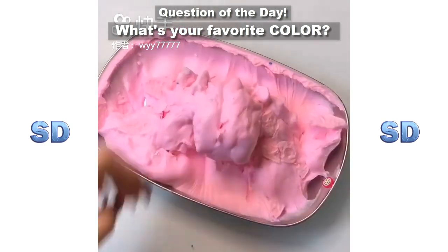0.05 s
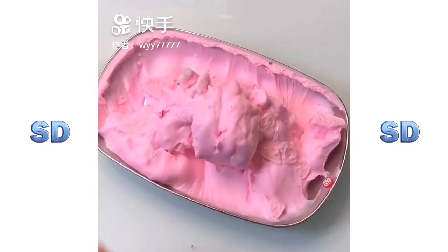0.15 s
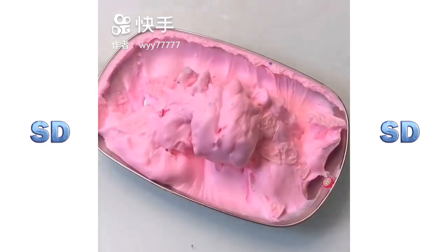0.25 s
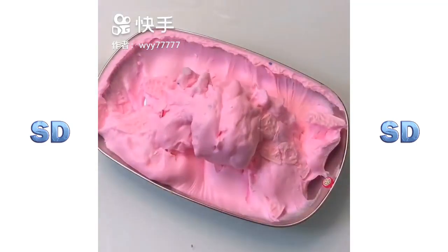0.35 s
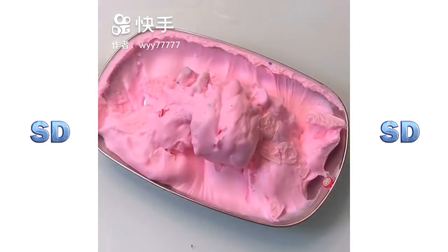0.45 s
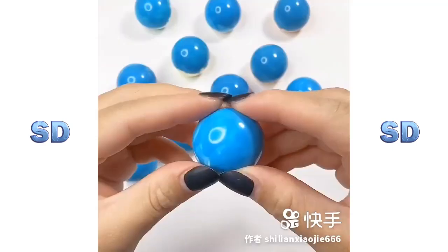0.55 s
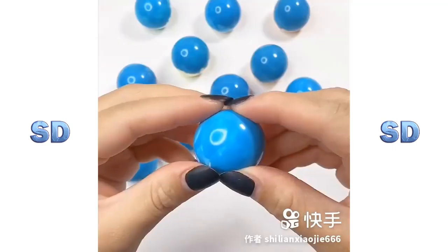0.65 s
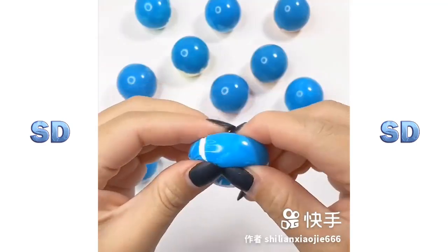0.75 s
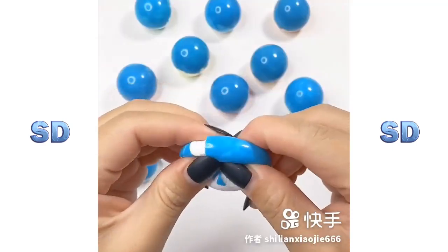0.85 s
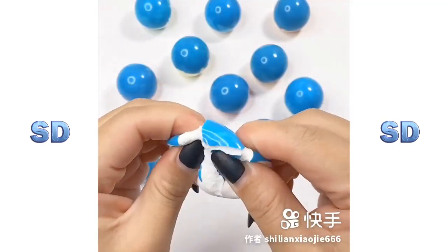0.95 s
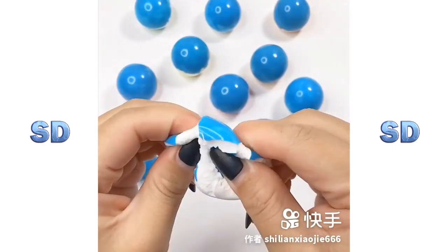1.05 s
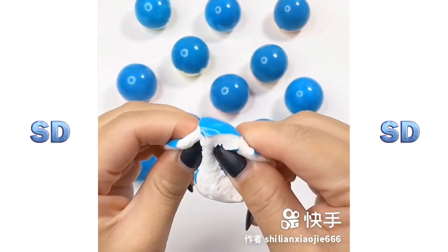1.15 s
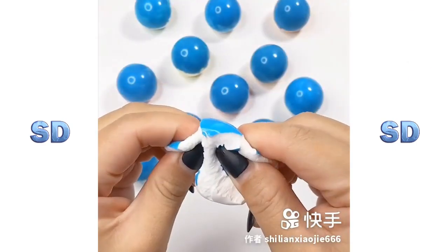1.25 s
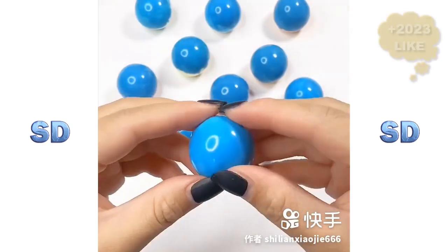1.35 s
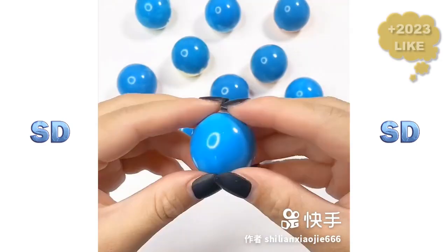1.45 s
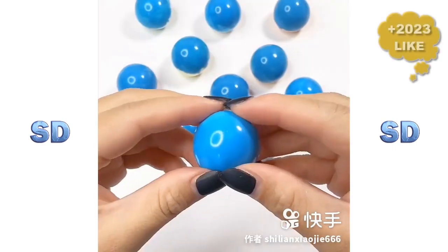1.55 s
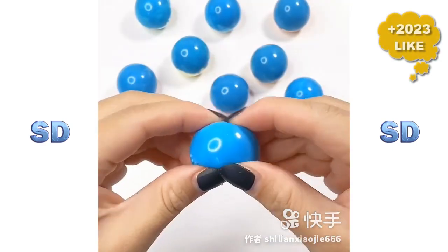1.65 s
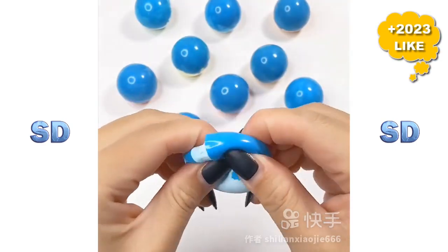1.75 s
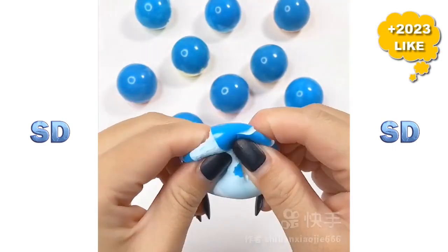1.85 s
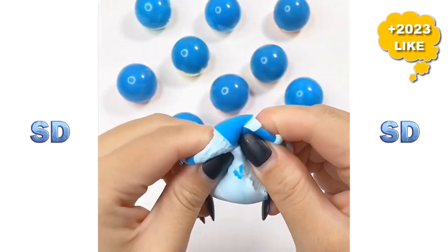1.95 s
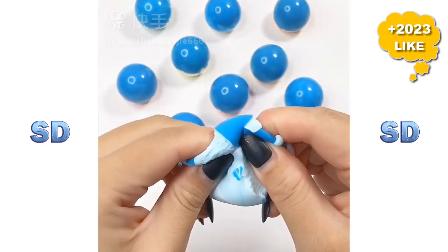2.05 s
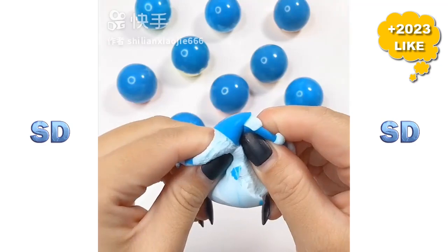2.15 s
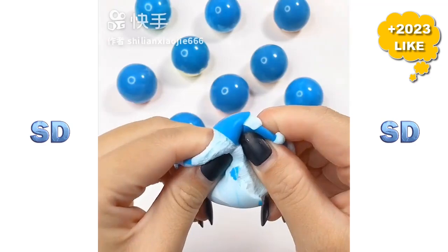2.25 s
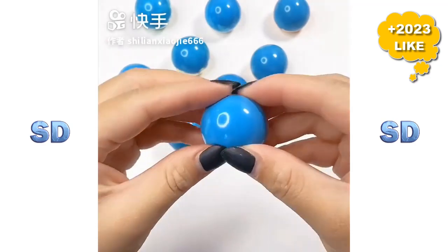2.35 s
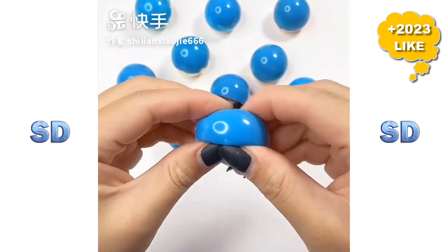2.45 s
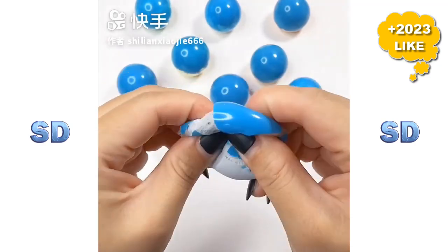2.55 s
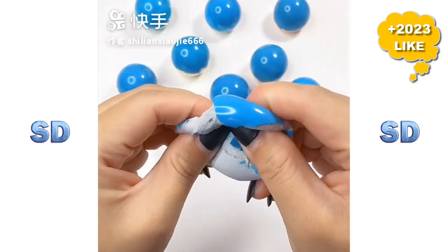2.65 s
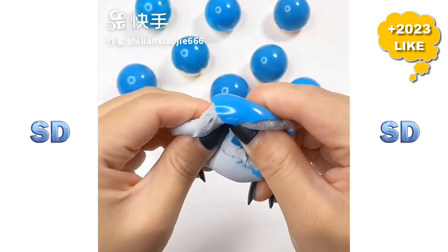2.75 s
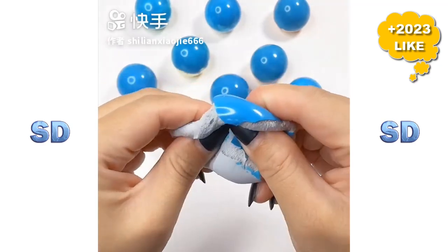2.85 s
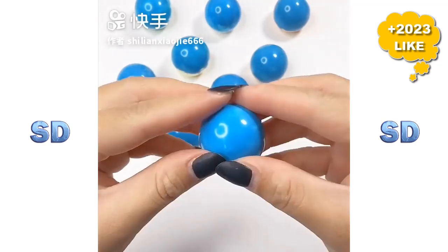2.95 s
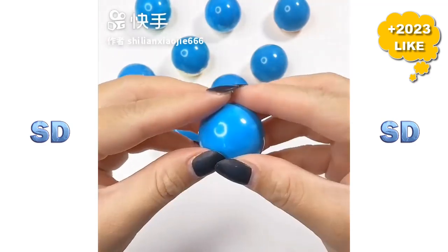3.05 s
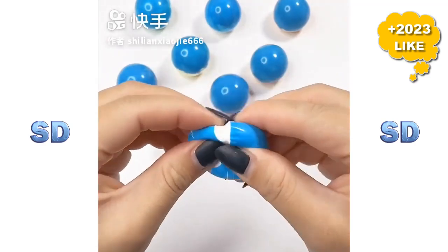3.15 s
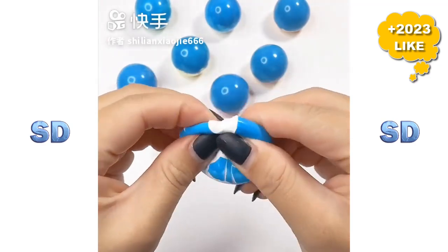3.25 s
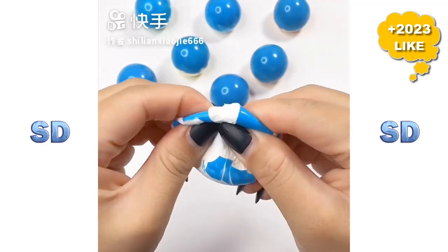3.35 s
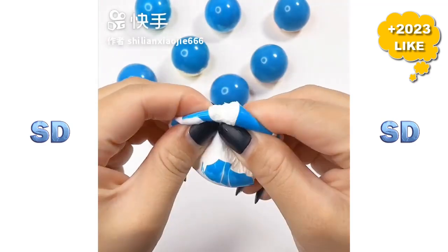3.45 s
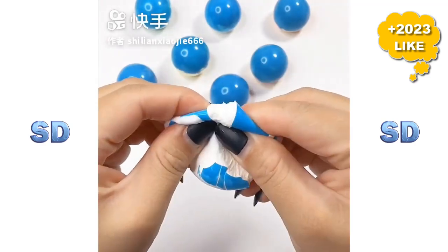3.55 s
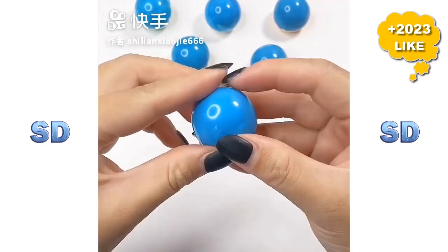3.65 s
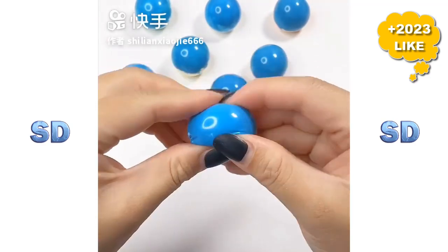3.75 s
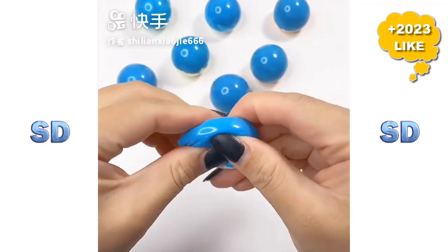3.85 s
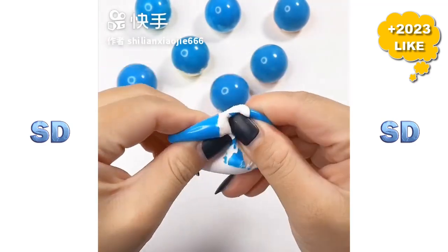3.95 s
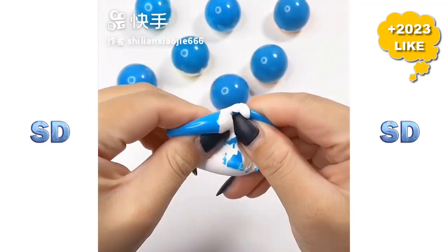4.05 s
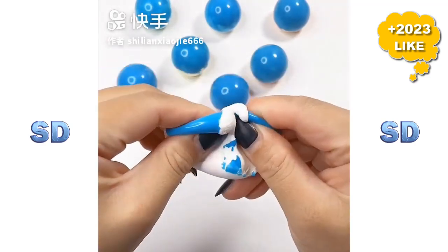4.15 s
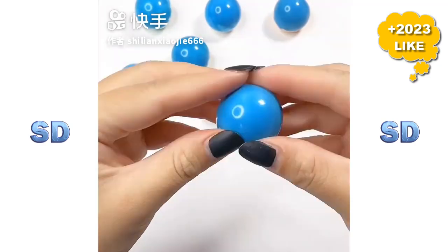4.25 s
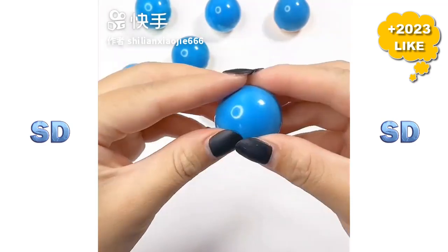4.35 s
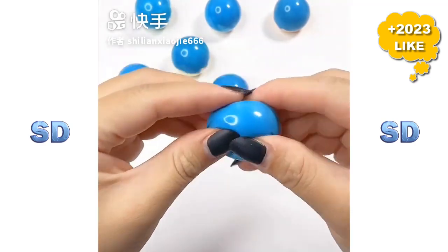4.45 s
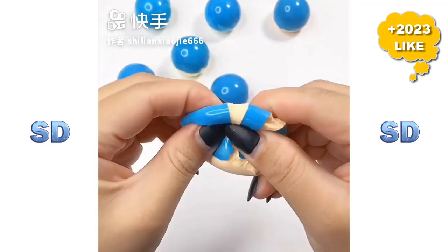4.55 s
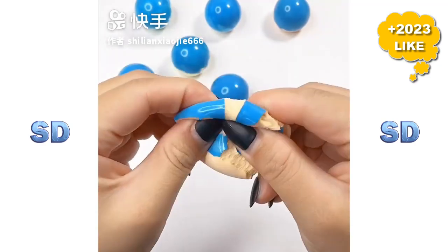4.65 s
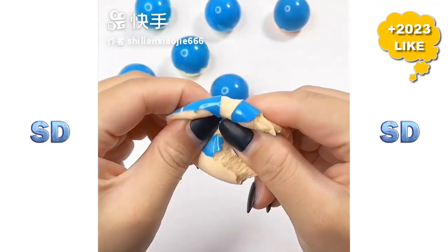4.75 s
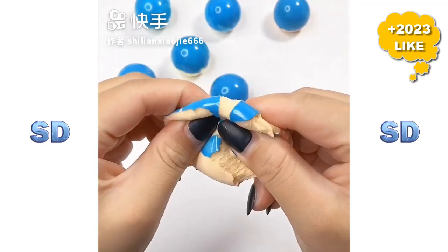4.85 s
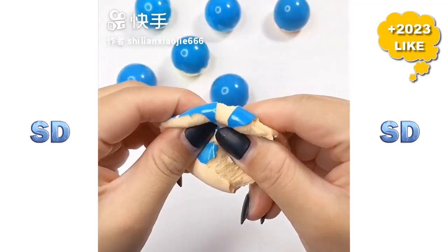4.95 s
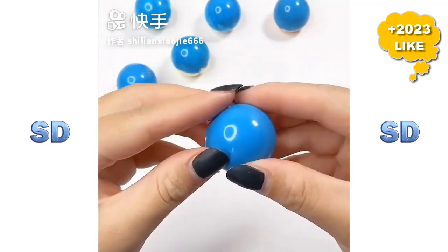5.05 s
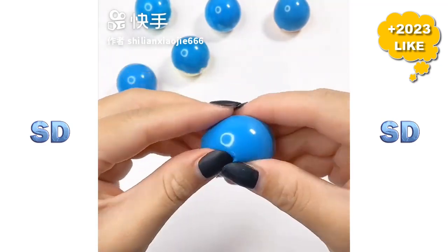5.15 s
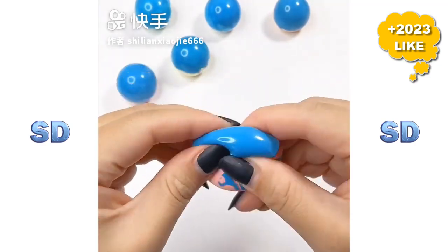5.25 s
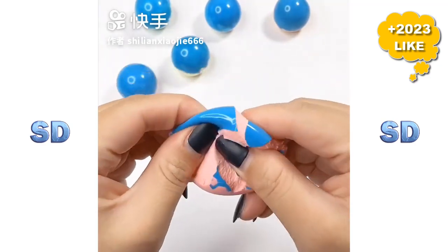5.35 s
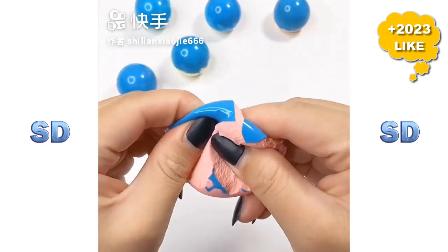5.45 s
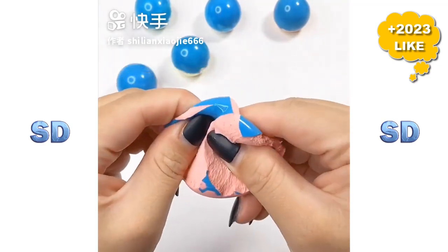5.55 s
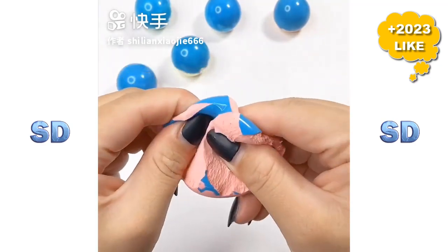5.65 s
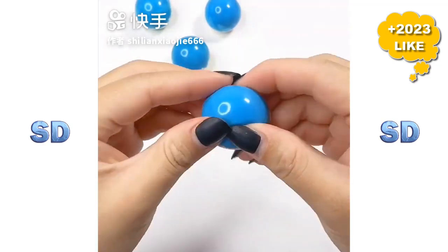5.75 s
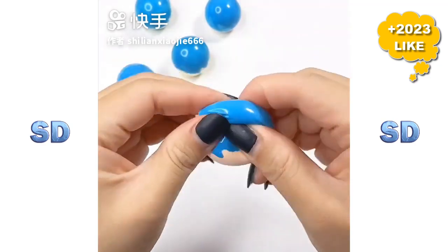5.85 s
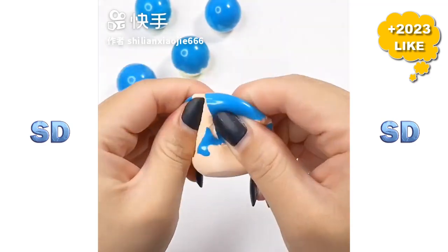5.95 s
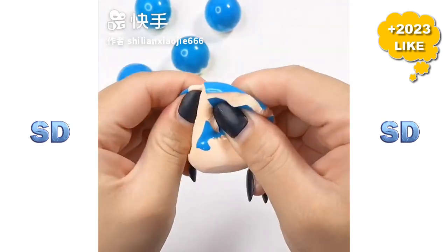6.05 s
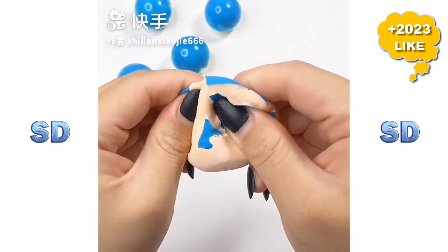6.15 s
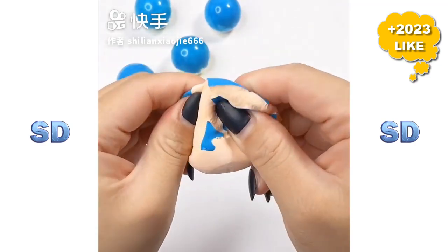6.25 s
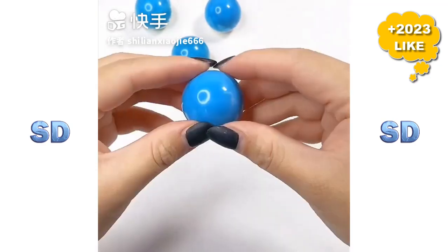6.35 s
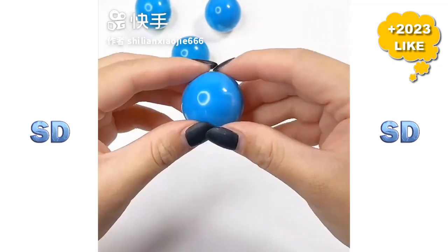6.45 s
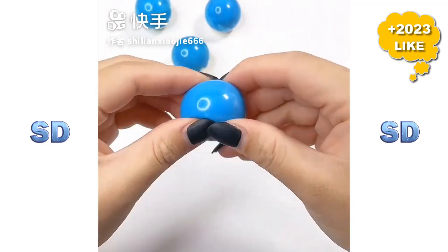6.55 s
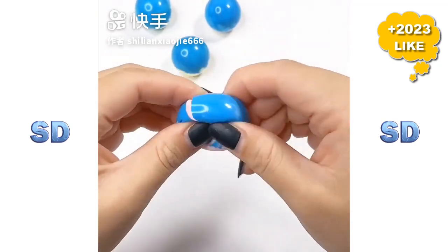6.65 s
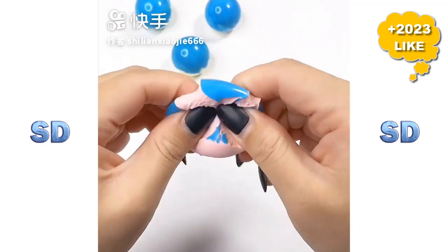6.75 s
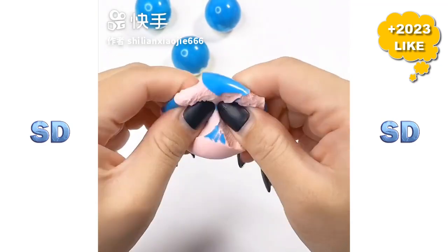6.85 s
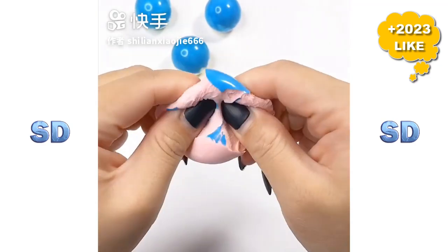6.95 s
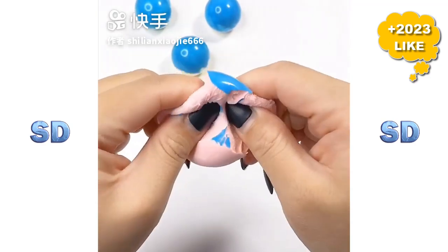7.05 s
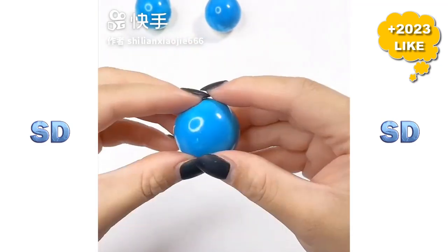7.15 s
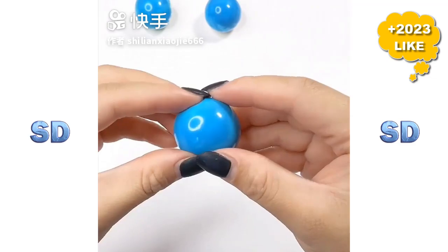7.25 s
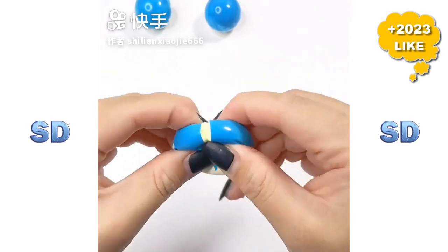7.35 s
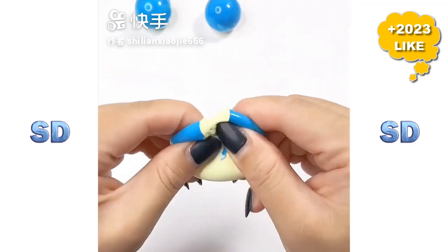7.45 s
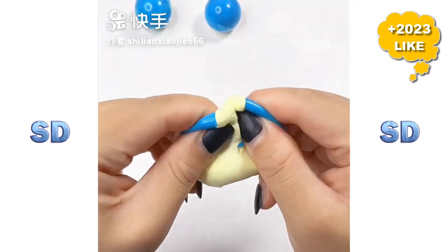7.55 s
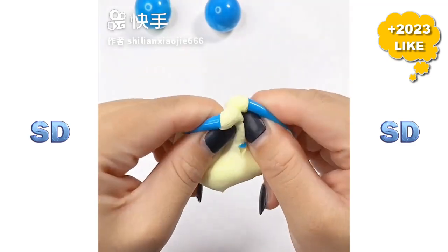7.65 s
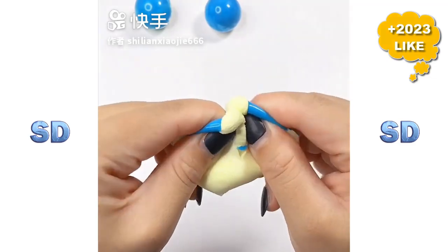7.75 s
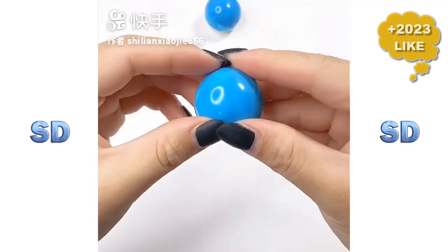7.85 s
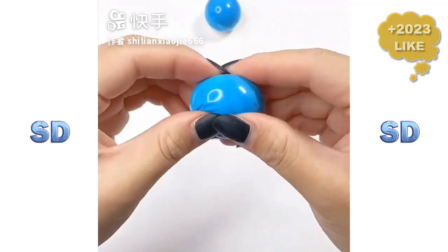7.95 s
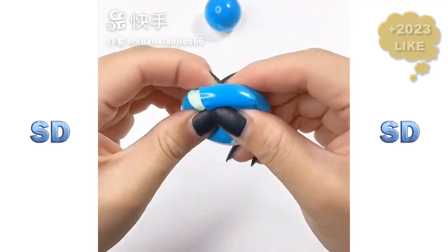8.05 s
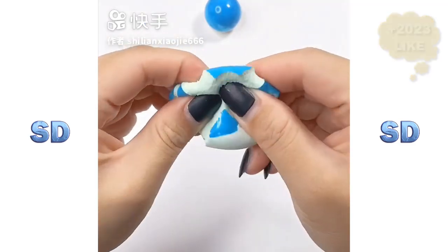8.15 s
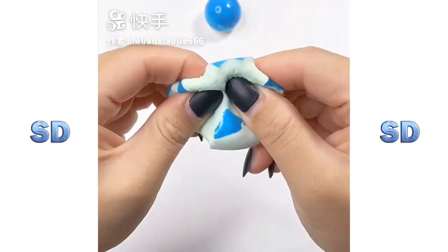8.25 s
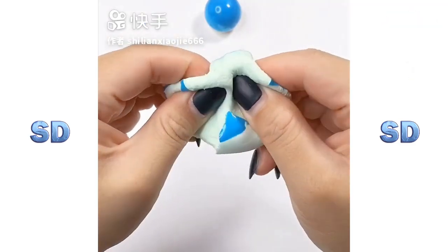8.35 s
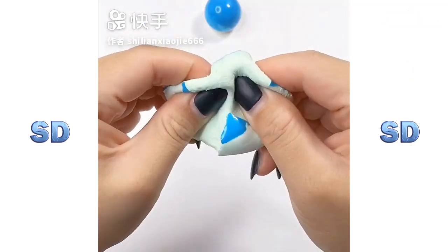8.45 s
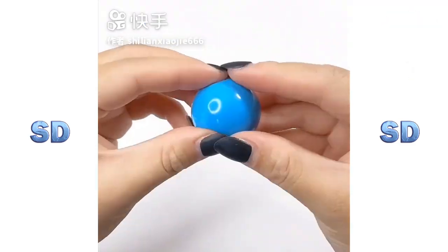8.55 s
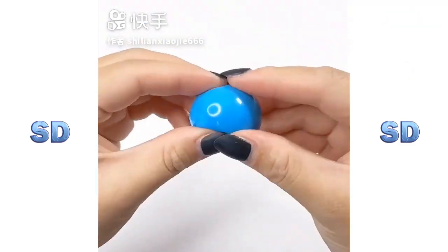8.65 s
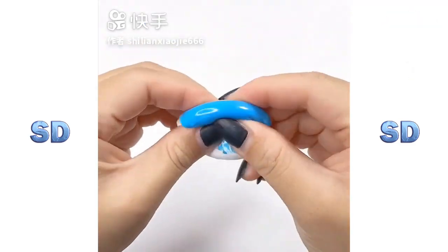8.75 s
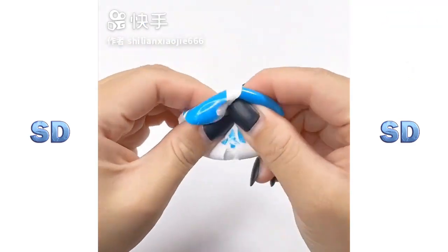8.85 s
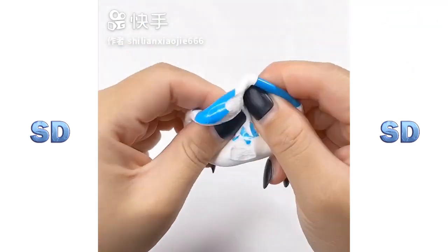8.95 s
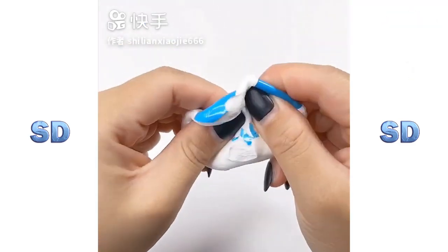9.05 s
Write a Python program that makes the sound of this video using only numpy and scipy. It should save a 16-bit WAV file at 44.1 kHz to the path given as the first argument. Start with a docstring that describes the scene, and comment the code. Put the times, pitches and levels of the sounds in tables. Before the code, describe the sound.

Close to a table in a small, quiet room, hands stir soft slime: a wet, sinking plop and dull pats at the very start, then faint rubbing and low thuds until about 0.55 seconds, where sound drops out for a blink. From 0.85 seconds thumbs crush brittle wax shells around slime balls. Each crush is a cluster of sharp, bright cracks over dense, gritty crumbling, lasting a few tenths of a second, with stray late snaps. Further crushes begin near 1.8, 2.55, 3.25, 3.9, 4.55, 5.3, 5.9, 6.7, 7.45, 8.1 and 8.75 seconds. Between them are quiet gaps with slight skin rubs and dull soft thuds. A distant engine drones faintly and waveringly from 0.6 to 3.3 seconds, over steady low room noise. A short, higher plop pops within the last crush at 8.9 seconds; crackling ends around 9.

```python
"""A small room, the microphone very close to a table: hands stir in a tub of soft slime with a wet plop,
a sinking sine; after a blink of silence twelve balls of slime in brittle wax shells are crushed in turn.
Resonant noise bursts make the sharp cracks and late snaps, dense tiny clicks the flakes crumbling under
the thumbs; filtered noise makes dull thuds and rubbing skin. A second, higher and shorter plop comes late.
Early on a far engine drones in wavering harmonics; steady room noise lies below. Loud peaks are rounded."""
import sys
import numpy as np
from scipy import signal
from scipy.fft import rfft, irfft
from scipy.io import wavfile

SR = 44100
rng = np.random.default_rng(int(sys.argv[2]) if len(sys.argv) > 2 else 0)


def wav_out(sig):
    """Save sig, one row per channel (or a flat mono array), as 16-bit PCM at SR to the path in sys.argv[1]."""
    wavfile.write(sys.argv[1], SR, np.round(np.clip(np.atleast_2d(sig).T, -1, 1) * 32767).astype(np.int16))


N = 400869
TIME = np.arange(N) / SR   # s

# main cracks and late snaps of the shells, before the wax colour:
# (t/s, level/dB of the energy spread over 4 ms, f/Hz of the breaking piece)
SHELL_CRACKS = [(0.6985, -36, 3060), (0.8513, -20.5, 4660), (0.87, -25, 6200), (0.8877, -13.5, 3880),
                (0.9294, -24.5, 5730), (0.981, -25, 10100), (0.9934, -15, 5640), (1.03, -18.5, 2980),
                (1.0562, -21.5, 2050), (1.1032, -15.5, 5070), (1.1186, -21.5, 4020), (1.2313, -38, 3260),
                (1.346, -46.5, 6530), (1.801, -12.5, 4950), (1.807, -19, 1580), (1.8459, -20, 5400),
                (1.8556, -25, 9940), (1.8703, -21.5, 7250), (1.878, -23, 8470), (1.8945, -13, 4250),
                (1.964, -15, 4280), (1.9748, -16.5, 3500), (1.993, -16, 3800), (2.0083, -29, 10000),
                (2.0756, -22, 4960), (2.1701, -18, 6360), (2.246, -37.5, 3020), (2.272, -39, 3340),
                (2.282, -34.5, 3080), (2.3022, -36.5, 2720), (2.346, -41, 3530), (2.3718, -41.5, 3500),
                (2.3986, -48, 4480), (2.558, -28, 5500), (2.5712, -10.5, 4400), (2.59, -37, 3500),
                (2.606, -22, 6400), (2.621, -18.5, 2887), (2.6626, -14, 4560), (2.6732, -17.5, 4960),
                (2.6864, -18.5, 5680), (2.719, -21.5, 4180), (3.2167, -26, 2950), (3.2607, -14, 3550),
                (3.2746, -12.5, 5800), (3.312, -34, 2540), (3.3427, -13, 4840), (3.362, -19, 10000),
                (3.3833, -15.5, 5840), (3.392, -19, 3050), (3.413, -14, 5530), (3.42, -14.5, 4130),
                (3.4753, -15.5, 4700), (3.5422, -44, 6240), (3.585, -38.5, 6200), (3.602, -43, 3970),
                (3.6274, -42, 5400), (3.8682, -26, 4200), (3.885, -22.5, 4400), (3.9098, -17, 2630),
                (3.9321, -19.5, 4420), (3.9828, -22.5, 4500), (4, -18.5, 6660), (4.009, -19, 4700),
                (4.0714, -14, 4330), (4.097, -26, 5100), (4.123, -25, 4870), (4.179, -16, 5830),
                (4.3015, -21, 4700), (4.5489, -17, 3500), (4.5641, -18, 3150), (4.5836, -19.5, 3000),
                (4.602, -19, 3670), (4.6224, -20, 6400), (4.6553, -17, 5160), (4.699, -20, 10000),
                (4.7241, -14.5, 5500), (4.752, -20.5, 5130), (4.8005, -32.5, 7440), (4.8871, -20, 4140),
                (5.2999, -18.5, 2530), (5.32, -19, 3780), (5.347, -24, 10000), (5.3692, -18, 3930),
                (5.425, -21.5, 4940), (5.4478, -20.5, 4150), (5.4562, -15.5, 2740), (5.519, -17.5, 7600),
                (5.6791, -18, 2960), (5.849, -39, 4300), (5.8985, -33, 3120), (5.926, -17, 5050),
                (5.9557, -15.5, 10500), (5.9673, -16.5, 5600), (5.981, -19, 3020), (6.0061, -16, 3850),
                (6.067, -17.5, 3770), (6.103, -20, 10800), (6.1389, -17, 1900), (6.1987, -25.5, 6940),
                (6.228, -19.5, 3580), (6.284, -26, 8850), (6.4794, -36.5, 5240), (6.681, -38.5, 5600),
                (6.7091, -26.5, 4500), (6.723, -26.5, 4680), (6.7538, -18.5, 9200), (6.7715, -22.5, 3030),
                (6.7867, -19.5, 2770), (6.8299, -20, 4280), (6.853, -21, 3040), (6.8773, -20.5, 5730),
                (6.9274, -18, 8200), (6.9421, -20, 4400), (6.9788, -21.5, 4860), (7.0258, -13.5, 3730),
                (7.042, -23.5, 11100), (7.1137, -31.5, 7050), (7.1558, -17.5, 6900), (7.196, -28, 7200),
                (7.459, -17.5, 4630), (7.5217, -15, 2420), (7.5694, -19.5, 3580), (7.5921, -13.5, 5800),
                (7.6461, -19, 4800), (7.722, -24.5, 7550), (7.9031, -21.5, 5600), (8.0605, -30.5, 4700),
                (8.069, -21.5, 4700), (8.0952, -20.5, 3700), (8.1042, -18, 4400), (8.1271, -12, 3900),
                (8.1587, -19, 3860), (8.1982, -14.5, 5800), (8.2334, -16.5, 4740), (8.251, -21, 2940),
                (8.2776, -16, 5200), (8.292, -16, 3800), (8.305, -20, 10000), (8.3616, -17, 5800),
                (8.4312, -24.5, 3530), (8.637, -35, 2560), (8.6716, -37.5, 1990), (8.7044, -30, 5050),
                (8.7545, -28, 4480), (8.775, -23.5, 2840), (8.7978, -20, 3000), (8.8181, -13, 3740),
                (8.8396, -11.5, 4940), (8.9164, -19.5, 9500), (8.954, -12, 7300), (8.9698, -17.5, 4550)]
# thumbs crush a ball in one push or two, levels before the wax colour:
# (t/s when the shell gives way, build-up/s, length/s, level/dB of the crumbling, release/(dB/s))
THUMB_SQUEEZES = [(0.849, 0.011, 0.06, -31.5, 225.5), (0.953, 0.0097, 0.16, -31, 261.5),
                  (1.778, 0.0021, 0.23, -35, 121), (2.546, 0.04, 0.12, -22, 273),
                  (3.243, 0.006, 0.09, -28, 100), (3.884, 0.019, 0.057, -25.5, 502),
                  (3.989, .005, 0.027, -23.5, 150.5), (4.556, 0.023, 0.14, -26.5, 221.5),
                  (5.296, 0.032, 0.13, -24, 167.5), (5.92, 0.021, 0.099, -26, 125.5),
                  (6.735, 0.0059, 0.11, -26, 117), (7.45, 0.041, 0.14, -23.5, 171),
                  (8.087, 0.017, 0.14, -26.5, 184.5), (8.768, 0.012, 0.19, -25.5, 166)]
# colour of all breaking wax: (f/Hz, gain/dB)
WAX_COLOUR = [(100, 1.5), (700, 1.5), (1350, -1), (2100, -3.5), (2700, 0), (3800, -3), (6000, -2),
              (11000, 2), (16000, 3)]
# ringing of the table and things nearby: (f/Hz, width/Hz, gain/dB)
NEARBY_RINGS = [(1408, 276, 1.5), (1900, 190, 0), (2496, 110, 1.5), (5500, 680, -7.5), (11760, 2200, -12.5)]
# dull low thuds of soft slime and of some big cracks: (t/s, peak level/dB, f/Hz, decay/s)
LOW_THUDS = [(0.055, -24.5, 247, 0.0043), (0.075, -35, 90.5, 0.042), (0.199, -40, 117, 0.059),
             (0.404, -40, 380, 0.0055), (0.589, -41, 134, 0.1), (3.34, -30, 151, 0.0027),
             (5.846, -41.5, 123, 0.012), (6.341, -35, 217, 0.035), (6.594, -46, 190, 0.082),
             (7.026, -37, 148, 0.002)]
# soft pats and rubs of skin on slime and wax:
# (t/s at the loudest, length/s, level/dB, centre f/Hz, width/Hz, stickiness 0-10)
SKIN_RUBS = [(0.023, 0.067, -33, 1700, 1900, 3), (0.067, 0.062, -37, 480, 100, 1.5),
             (0.26, 0.34, -45, 1390, 3500, 0.9), (0.401, 0.045, -45.5, 468, 200, 1),
             (0.68, 0.0047, -43, 1510, 1500, 0.5), (1.47, 0.072, -52, 2160, 4000, 4),
             (2.295, 0.28, -54.5, 3230, 2210, 4), (3.55, 0.059, -44.5, 4220, 6000, 6),
             (5.142, 0.017, -40.5, 1900, 1000, 1.1), (6.407, 0.12, -47, 2730, 6000, 3.9),
             (8.645, 0.019, -41.5, 1700, 2980, 1.8)]
# air pockets in the slime pop: (t/s, peak level/dB, starting f/Hz, decay/s)
AIR_POCKETS = [(0.0205, -20.5, 1000, 0.011), (8.8903, -13.5, 1580, 0.0035)]
# harmonics of the far engine: (multiple of its turning rate, relative level/dB)
ENGINE_HARMONICS = [(2, -3), (3, -9.5), (5, -9), (6, -5), (7, -11.5)]
# course of the engine, silent outside it: (t/s, turning rate/Hz, level/dB)
ENGINE_COURSE = [(0.569, 36, -62), (1.35, 36.7, -52.5), (1.7, 33.3, -62), (2.95, 32.5, -53.5),
                 (3.3, 28.5, -67)]
# spectral shape of the room noise with its low drone: (f/Hz, relative density/dB per Hz)
ROOM_NOISE = [(20, -22), (52, -10.5), (66, 2), (80, -14), (140, -10), (200, -13.5), (350, -15), (700, -24),
              (2000, -29.5), (16000, -38.5)]

PRESS_DB_PER_S = 1500   # how abruptly a squeeze sets in
SAG_DB_PER_S = 9.5   # the crumbling sinks a little while the shell is used up
BUILD_UP_DB = 16   # it starts this far below its full level
TABLE_ECHO_S, TABLE_ECHO_DB = 0.0014, -16   # the table top throws every crack back
ROOM_T60_S, ROOM_DB = 0.21, -18.5
ROOM_NOISE_DB = -55
CUTOFF_HZ = 16200   # upper limit of the microphone


def cracks(snap_s=.00058, growth=.5, vary_db=2.5, rise_share=0.95, chips_db=-23, chips_s=0.0049,
           bare_share=0.18, warning_db=-18.0, warning_s=0.0027, size=1200):
    """A fracture gathers speed and runs briefly, longer when big; its piece rings and chips follow."""
    out, t = np.zeros(N), TIME[:size]
    noises = rng.standard_normal((len(SHELL_CRACKS), size))
    for (s, db, hz), noise in zip(SHELL_CRACKS, noises):
        # the first few noise values also vary the crack
        run_s = snap_s * from_db(growth * max(db + 19, -4) + vary_db * noise[0])
        rise_s = rise_share * run_s
        swell = 1 - np.exp(-(t / rise_s) ** 2)
        fade = np.exp(-t / run_s) + from_db(chips_db) * np.exp(-t / chips_s)
        burst = noise * swell * fade
        width_hz = hz * from_db(vary_db * noise[1])
        snap = resonate(burst, hz, width_hz) + bare_share * burst
        snap = from_db(db) * snap / np.sqrt(np.sum(snap ** 2) / (.004 * SR))
        add(out, s - rise_s / 2, snap)
        add(out, s + TABLE_ECHO_S * from_db(noise[4]), from_db(TABLE_ECHO_DB) * snap)
        # the strained shell ticks a few milliseconds before it gives way
        lead_s = warning_s * from_db(vary_db * noise[2])
        tick_db = db + warning_db + 2 * vary_db * noise[3]
        add(out, s - lead_s, from_db(tick_db) * noise[::-1] * np.exp(-2 * t / lead_s))
    return out


def crumble(per_s=3500, thinning=0.46, spread_db=5.0, slides_per_s=130, slide_s=0.0026,
            slide_gain=4.45, relative_width=0.94, dust_db=-7, count=14):
    """Tiny fractures, thousands a second and fewer as pressure eases, ring at many pitches over dust."""
    level = from_db(np.maximum(crumbling_db(TIME), -100))
    busy = (level / level.max()) ** thinning
    sizes = from_db(spread_db * np.minimum(rng.exponential(1, N), 3)) * rng.choice([-1, 1], N)
    struck = rng.random(N) < per_s * busy / SR
    clicks = sizes * struck / np.sqrt(busy)
    # each click is dealt at random to one of the pitches
    dealt = rng.integers(0, count, N)
    flakes = np.zeros(N)
    for k, hz in enumerate(np.geomspace(1200, 13500, count)):
        flakes += resonate(clicks * (dealt == k) + 1e-18, hz, hz * relative_width)
    # little avalanches: fractures swell in random surges
    flakes = flakes * np.sqrt(1 + slide_gain ** 2 * slips(slides_per_s, slide_s))
    dust = np.diff(rng.standard_normal(N + 1))   # bright noise
    return level * (rms_one(flakes) + from_db(dust_db) * rms_one(dust))


def crumbling_db(t):
    """Each squeeze sets in fast, builds up, holds with a slight sag and lets go; the loudest counts."""
    courses = []
    for s, build_s, length_s, db, release in THUMB_SQUEEZES:
        age = t - s
        press = PRESS_DB_PER_S * np.minimum(age, 0)
        build_up = BUILD_UP_DB * np.exp(-np.clip(age / build_s, 0, 10))
        sag = SAG_DB_PER_S * (age - length_s / 2)
        let_go = release * np.maximum(age - length_s, 0)
        courses.append(db + press - build_up - sag - let_go)
    return np.max(courses, axis=0)


def ringing(x):
    """The table and things nearby resonate along with the sound."""
    return sum(from_db(db) * resonate(x, hz, width_hz) for hz, width_hz, db in NEARBY_RINGS)


def plop(fall_per_s=5.1):
    """An opened air pocket rings for a moment as a decaying sine, sinking in pitch."""
    out, t = np.zeros(N), TIME[:SR // 20]
    for s, db, hz, decay_s in AIR_POCKETS:
        turns = hz * (t - fall_per_s * t ** 2 / 2)
        add(out, s, from_db(db) * np.exp(-t / decay_s) * np.sin(2 * np.pi * turns))
    return out


def thuds(size=8000):
    """Dull low thuds of soft slime and of some big cracks: decaying noise, two equal broad resonances."""
    out = np.zeros(N)
    noises = rng.standard_normal((len(LOW_THUDS), size))
    for (s, db, hz, decay_s), noise in zip(LOW_THUDS, noises):
        push = noise * np.exp(-TIME[:size] / decay_s)
        thud = resonate(resonate(push, hz, hz), hz, hz)
        add(out, s, from_db(db) * thud / np.max(np.abs(thud)))
    return out


def rubs(slips_per_s=120, slip_s=0.0014, hiss_db=-32):
    """Skin sticks and slips: surging friction noise swells and fades, with a thin hiss on top."""
    out, noise, surges = np.zeros(N), rng.standard_normal(N), slips(slips_per_s, slip_s)
    for s, length_s, db, hz, width_hz, stickiness in SKIN_RUBS:
        friction = noise * np.sqrt(1 + stickiness ** 2 * surges)
        swell = np.exp(-2 * np.minimum(((TIME - s) / length_s) ** 2, 20))
        rub = resonate(friction, hz, width_hz) + from_db(hiss_db) * friction
        out += from_db(db) * swell * rms_one(rub)
    return out


def slips(per_s, length_s):
    """Random little surges of power that swell quickly and die away."""
    starts = (rng.random(N) < per_s / SR) * (2 * rng.random(N)) ** 2
    age = TIME[:SR // 100] / length_s
    return np.convolve(starts, age * np.exp(1 - 2 * age))[:N]


def room(x, first_s=0.012, build_s=.003, wall_hz=4000, bright_share=0.25):
    """Walls return a short, smooth noise tail following the sound's power, stronger in the low treble."""
    t = TIME[:SR // 2]
    onset = 1 - np.exp(-np.maximum(t - first_s, 0) / build_s)
    decay = (from_db(-60 * t / ROOM_T60_S) * onset) ** 2   # of power
    power = np.maximum(signal.fftconvolve(x ** 2, decay / decay.sum())[:N], 0)
    wash = rng.standard_normal(N)
    wash = bright_share * wash + resonate(wash, wall_hz, 2 * wall_hz)
    return x + from_db(ROOM_DB) * np.sqrt(power) * rms_one(wash + ringing(wash))


def engine(waver_db=6.0, waver_per_s=11):
    """Low harmonics of a far engine follow its turning rate, each wavering on its own."""
    s, speed, db = np.transpose(ENGINE_COURSE)
    turns = np.cumsum(np.interp(TIME, s, speed)) / SR
    wavers = rng.standard_normal((len(ENGINE_HARMONICS), 128))
    out = np.zeros(N)
    for (order, order_db), waver in zip(ENGINE_HARMONICS, wavers):
        gains = from_db(order_db + waver_db * waver)
        gain = np.interp(TIME * waver_per_s, np.arange(len(waver)), gains)
        out += gain * np.sin(2 * np.pi * order * turns)
    return np.interp(TIME, s, from_db(db), left=0, right=0) * out


def background():
    """Steady room noise with a low drone: white noise shaped by a spectrum."""
    return from_db(ROOM_NOISE_DB) * rms_one(colour(rng.standard_normal(N), ROOM_NOISE))


def from_db(db):
    """Amplitude factor of a level in dB."""
    return 10 ** (np.asarray(db) / 20)


def rms_one(x):
    """Scale to an RMS of 1."""
    return x / np.sqrt(np.mean(x ** 2) + 1e-20)


def add(out, s, sound):
    """Mix a sound in at a time in seconds."""
    i = max(int(s * SR), 0)
    out[i:i + len(sound)] += sound[:max(N - i, 0)]


def resonate(x, hz, width_hz):
    """One resonance, gain 1 on top."""
    hz, width_hz = np.clip([hz, width_hz], 10, .4 * SR)
    return signal.lfilter(*signal.iirpeak(hz, hz / width_hz, fs=SR), x)


def colour(x, points, size=8192):
    """Causal (minimum-phase) filter that follows a table of (f/Hz, gain/dB)."""
    hz, db = np.transpose(points)
    grid = np.maximum(np.arange(size // 2 + 1) * SR / size, 1)
    gain = from_db(np.interp(np.log(grid), np.log(hz), db))
    # folding the cepstrum onto positive times gives minimum phase
    cepstrum = irfft(np.log(gain))
    cepstrum[1:size // 2] *= 2
    cepstrum[size // 2 + 1:] = 0
    return signal.fftconvolve(x, irfft(np.exp(rfft(cepstrum))))[:N]


def scene():
    """Breaking wax with its room tail, the other sources without; a blink of silence precedes the balls."""
    snaps = from_db(1.0) * colour(cracks(), WAX_COLOUR)
    flakes = from_db(1.5) * colour(crumble(), WAX_COLOUR)
    wax = snaps + flakes + ringing(from_db(0.5) * snaps + from_db(-6.0) * flakes)
    sounding = (TIME < .559) | (TIME > .575)   # s
    mix = room(wax) + plop() + thuds() + rubs() + engine() + background()
    return (sounding * mix)[None]


def record(dry):
    """The close microphone limits the band, rounds off the loudest peaks and cuts the top again."""
    ceiling = .47   # of full scale
    low_pass = signal.firwin(161, CUTOFF_HZ, fs=SR)[None]
    heard = signal.fftconvolve(dry, low_pass, "same")
    rounded = heard / (1 + (heard / ceiling) ** 4) ** (1 / 4)
    return signal.fftconvolve(rounded, low_pass, "same")


dry = scene()
out = record(dry)
wav_out(out)
```